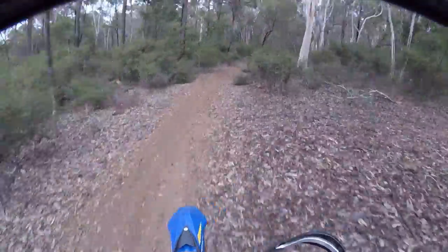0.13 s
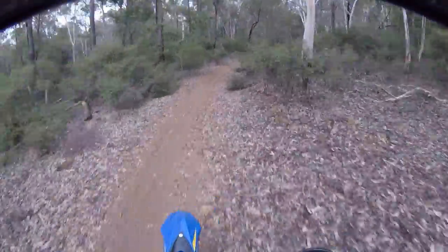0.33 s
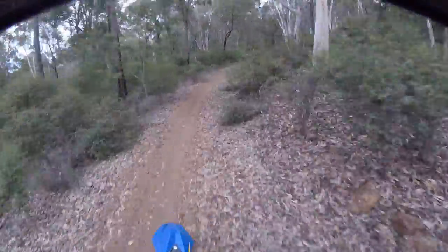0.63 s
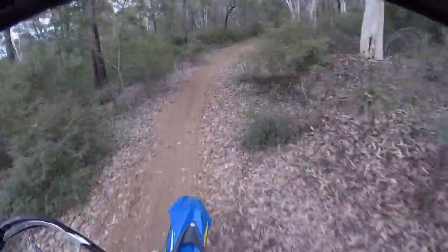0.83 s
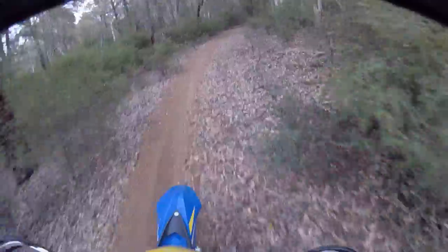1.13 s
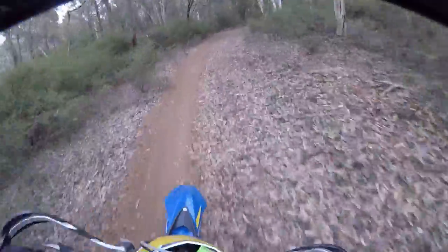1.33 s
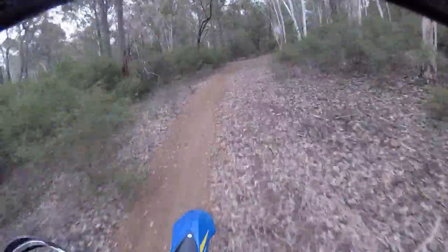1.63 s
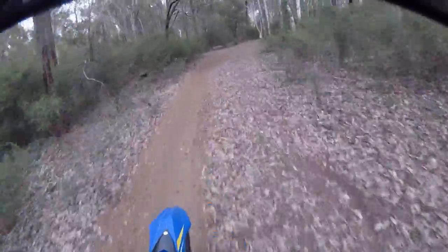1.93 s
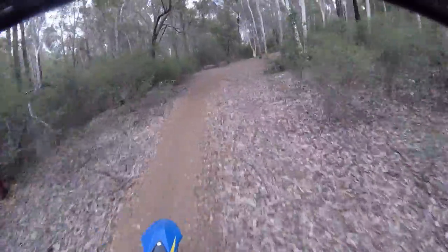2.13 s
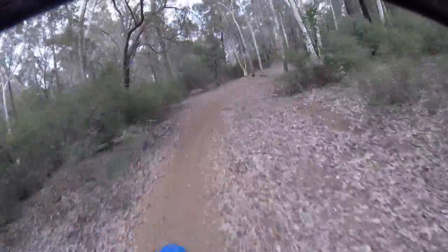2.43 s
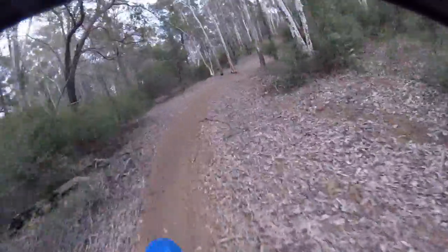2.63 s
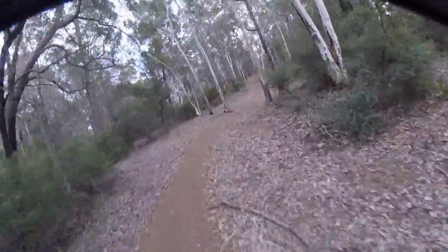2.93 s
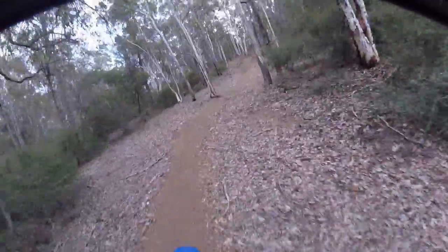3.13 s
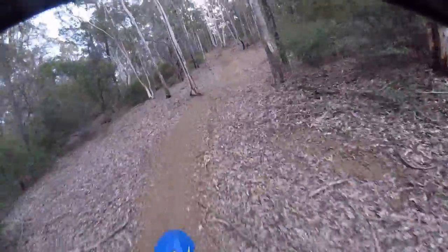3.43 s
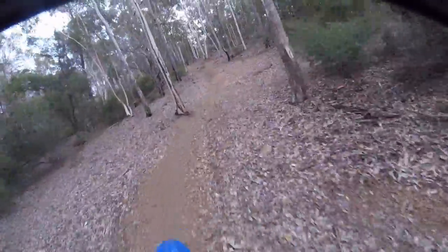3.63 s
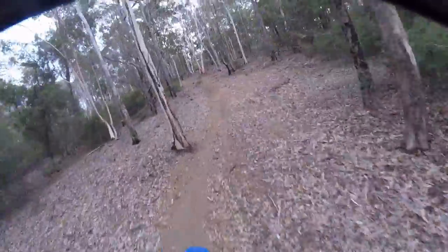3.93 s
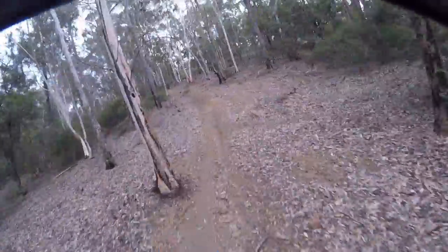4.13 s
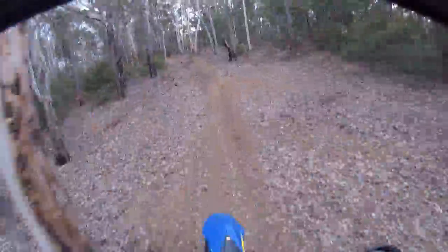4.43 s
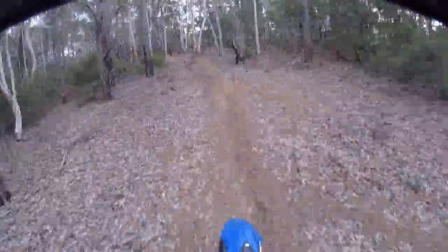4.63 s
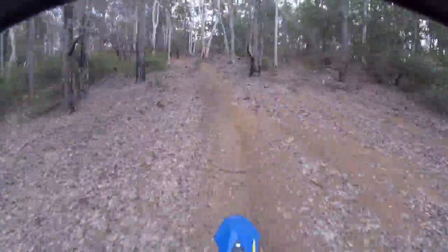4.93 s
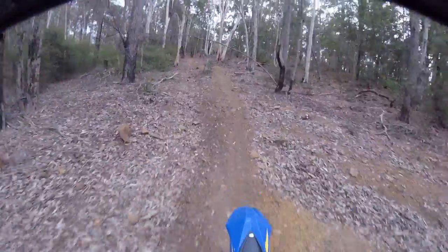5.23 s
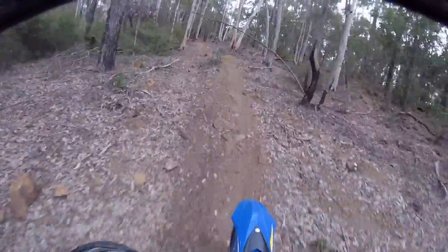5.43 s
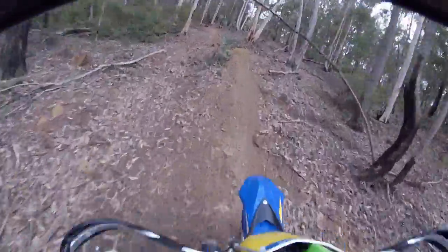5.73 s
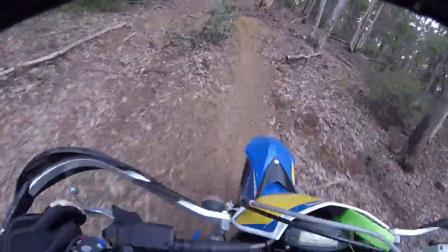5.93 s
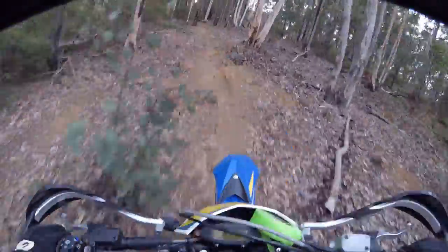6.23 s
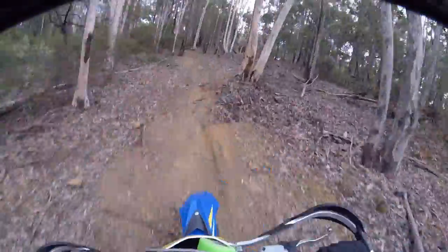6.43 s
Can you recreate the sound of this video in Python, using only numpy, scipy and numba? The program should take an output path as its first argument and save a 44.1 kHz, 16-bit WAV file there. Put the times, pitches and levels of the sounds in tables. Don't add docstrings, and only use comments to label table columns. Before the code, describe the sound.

A single-cylinder dirt bike rides a bush trail, revs surging early, sagging to a low chug, then climbing again over rattling metal and wind rumble.

```python
import sys
import numpy as np
from scipy import signal
from scipy.fft import rfft, irfft
from scipy.io import wavfile
from scipy.ndimage import uniform_filter1d
from numba import njit

SR = 44100
rng = np.random.default_rng(int(sys.argv[2]) if len(sys.argv) > 2 else 0)


def transcribe(u):
    v = np.clip(np.atleast_2d(u).T, -1, 1)
    q = np.round(v * 32767).astype(np.int16)
    wavfile.write(sys.argv[1], SR, q)


def to_linear_factor(level_db):
    exponent = np.asarray(level_db, float) / 20
    return 10 ** exponent


N = 291060
T = np.arange(N) / SR
BLOW_LEAD_S = .0066


def curves(table):
    time_s, *columns = np.transpose(table)
    return [np.interp(T, time_s, column) for column in columns]


def even(x):
    power = uniform_filter1d(uniform_filter1d(x ** 2, size=4000), size=4000)
    return x / np.sqrt(power + 1e-12)


@njit
def svf(x, centre_hz, width_hz):
    y, band_state, low_state = np.empty(len(x)), 0., 0.
    for i in range(len(x)):
        g = np.tan(np.pi * centre_hz[i] / SR)
        k = width_hz[i] / centre_hz[i]
        v = (band_state + g * (x[i] - low_state)) / (1 + g * (g + k))
        band_state = 2 * v - band_state
        low_state = low_state + 2 * g * v
        y[i] = k * v
    return y


def band(x, centre_hz, width_hz):
    return svf(x, centre_hz + 0. * T, np.maximum(width_hz, 10) + 0. * T)


def body(x, modes):
    return sum(to_linear_factor(db) * band(band(x, hz, width_hz), hz, 3 * width_hz) for hz, width_hz, db in modes)


def lowpass(x, order, hz):
    return signal.sosfilt(signal.butter(order, hz, fs=SR, output="sos"), x)


def walk(rate_hz):
    hold = int(SR / rate_hz)
    steps = np.repeat(rng.standard_normal(N // hold + 1), hold)
    return uniform_filter1d(steps, hold)[:N]


def push(at, size, ms):
    x = np.zeros(N)
    x[np.clip(at, 0, N - 1)] = size
    return np.convolve(x, np.hanning(int(ms * SR / 1000) + 3))[:N]


def exhaust(turn, hz):
    # (time [s], crank drone level [dB], header thump level [dB])
    lows = [(0.0, -19.2, -28.1), (0.087, -20.6, -24.8), (0.174, -21.6, -25.8), (0.261, -21.9, -26.0),
            (0.347, -20.6, -32.4), (0.434, -20.2, -31.0), (0.521, -19.4, -25.6), (0.608, -20.0, -31.5),
            (0.695, -19.5, -35.3), (0.782, -19.7, -35.4), (0.868, -18.4, -31.9), (0.955, -22.1, -40.0),
            (1.042, -24.1, -40.0), (1.129, -25.3, -40.0), (1.216, -25.5, -40.0), (1.303, -28.0, -40.0),
            (1.389, -31.3, -31.6), (1.476, -32.3, -26.1), (1.563, -28.0, -31.7), (1.65, -25.7, -31.6),
            (1.737, -25.9, -32.2), (1.824, -24.2, -30.7), (1.911, -23.7, -34.4), (1.997, -23.5, -31.2),
            (2.084, -23.5, -29.4), (2.171, -24.2, -30.8), (2.258, -26.1, -22.4), (2.345, -25.4, -27.4),
            (2.432, -22.9, -29.2), (2.518, -23.8, -21.0), (2.605, -24.9, -18.9), (2.692, -25.0, -18.4),
            (2.779, -24.1, -18.4), (2.866, -24.7, -19.4), (2.953, -23.8, -19.4), (3.039, -24.6, -19.3),
            (3.126, -24.5, -19.0), (3.213, -23.7, -21.6), (3.3, -21.1, -26.5), (3.387, -21.1, -26.2),
            (3.474, -21.1, -25.8), (3.561, -21.2, -24.6), (3.647, -20.2, -24.6), (3.734, -20.9, -25.1),
            (3.821, -21.2, -22.7), (3.908, -23.3, -29.0), (3.995, -25.5, -32.8), (4.082, -22.3, -30.4),
            (4.168, -21.8, -22.6), (4.255, -22.6, -29.7), (4.342, -21.4, -28.3), (4.429, -21.8, -29.1),
            (4.516, -21.8, -29.6), (4.603, -21.5, -28.9), (4.689, -20.9, -32.0), (4.776, -22.6, -30.0),
            (4.863, -23.0, -29.0), (4.95, -23.7, -34.8), (5.037, -22.6, -32.7), (5.124, -22.5, -32.6),
            (5.211, -21.6, -38.4), (5.297, -21.7, -31.0), (5.384, -21.5, -37.5), (5.471, -22.0, -36.7),
            (5.558, -25.7, -38.2), (5.645, -29.5, -25.3), (5.732, -31.2, -23.4), (5.818, -26.4, -33.5),
            (5.905, -25.5, -31.3), (5.992, -27.5, -35.4), (6.079, -26.5, -31.7), (6.166, -25.6, -32.0),
            (6.253, -25.6, -30.3), (6.339, -27.2, -30.9), (6.426, -26.8, -32.5), (6.513, -24.1, -31.0),
            (6.6, -23.1, -32.9)]
    # (time [s], silencer ring level [dB], bark level [dB])
    pipe = [(0.0, -18, -29), (0.07, -23, -31), (0.11, -15.5, -29), (0.15, -23, -32.5), (0.66, -20.5, -28.5),
            (0.79, -14.5, -28.5), (0.84, -15, -21.5), (1.27, -18, -25), (1.29, -16, -26.5),
            (1.32, -30, -28), (1.38, -21.5, -33.5), (1.63, -30, -41), (1.89, -24, -33.5),
            (1.93, -20.5, -31), (2.13, -23.5, -35), (2.15, -25, -33), (2.19, -39, -35), (2.22, -20, -32.5),
            (2.24, -21.5, -37.5), (2.48, -29, -37), (2.5, -20.5, -37), (2.66, -22, -34),
            (2.7, -20.5, -33.5), (2.74, -22.5, -32.5), (2.76, -26.5, -35), (3.14, -27, -38.5),
            (3.2, -27, -37), (3.22, -34, -47.5), (3.23, -35, -34), (3.25, -20.5, -36.5), (3.31, -19, -30.5),
            (3.33, -21, -33.5), (3.4, -22, -32.5), (3.42, -22, -34), (3.67, -22, -32.5), (3.71, -21, -31),
            (3.73, -26, -33.5), (3.95, -32, -40), (3.99, -23.5, -38), (4.25, -21, -35), (4.28, -19, -28),
            (4.61, -17, -28.5), (4.87, -19.5, -28.5), (4.89, -22.5, -28), (5.11, -15.5, -24.5),
            (5.31, -20, -27), (5.5, -21, -25.5), (5.6, -25.5, -30.5), (5.68, -24.5, -29), (5.72, -21, -35),
            (5.79, -24.5, -35), (5.84, -19, -27), (5.86, -20.5, -33), (5.92, -19, -29.5), (5.99, -28, -30),
            (6.07, -28, -34.5), (6.14, -24, -33), (6.34, -27.5, -40.5), (6.36, -23.5, -41),
            (6.47, -32.5, -39), (6.51, -17, -28), (6.58, -16.5, -26), (6.6, -10, -15)]
    drone_db, thump_db = curves(lows)
    ring_db, bark_db = curves(pipe)
    throttle = np.clip((bark_db + 35) / 10, 0, 1)
    at = np.flatnonzero(np.diff(np.floor(turn + BLOW_LEAD_S * hz)))
    at = at + (2 * rng.standard_normal(len(at))).astype(int)
    blow = push(at, to_linear_factor(1.1 * rng.standard_normal(len(at))), ms=1.1)
    return (to_linear_factor(ring_db) * silencer_ring(blow, throttle)
            + to_linear_factor(thump_db - 0.5) * header_thump(blow)
            + to_linear_factor(bark_db - 1.0) * tailpipe_bark(at, turn, hz, throttle)
            + to_linear_factor(drone_db + 1.5) * crank_drone(turn, hz))


def silencer_ring(blow, throttle):
    # (time [s], centre [Hz], width [Hz])
    chamber = [(0, 208, 103), (.55, 243, 111), (.72, 271, 86), (.84, 274, 40.7), (1., 272, 57),
               (1.28, 283, 56), (1.36, 283, 152), (1.6, 234, 178), (2.15, 220, 164), (2.25, 279, 119),
               (2.5, 290, 107), (3.2, 290, 107), (3.3, 324, 131), (3.7, 254, 152), (3.95, 276, 123),
               (4.22, 270, 120), (4.32, 314, 86), (4.95, 307, 86.4), (5.08, 264, 50), (5.2, 294, 64.4),
               (5.5, 315, 80.4), (5.66, 273, 153), (5.8, 310, 149), (5.9, 340, 70), (6.05, 335, 140),
               (6.45, 302, 161), (6.53, 256, 50.4), (6.6, 270, 50.3)]
    ring_hz, width_hz = curves(chamber)
    gulp = .45 * throttle * np.roll(blow, -int(.0072 * SR))
    drive = blow + gulp
    ring = even(band(band(drive, ring_hz, width_hz), ring_hz, 2 * width_hz))
    ring = ring + to_linear_factor(-13) * even(band(rng.standard_normal(N), 250, 220))
    ring = signal.sosfiltfilt(signal.butter(4, 400, fs=SR, output="sos"), ring)
    next_mode = even(band(band(drive, 350, 70), 355, 160))
    return ring + throttle * to_linear_factor(-8) * next_mode


def header_thump(blow):
    late_blow = np.roll(blow, int(.0009 * SR))
    return even(band(band(late_blow, 112, 50), 115, 80))


def tailpipe_bark(at, turn, hz, throttle):
    # (centre [Hz], width [Hz], level [dB])
    shock_modes = [(427, 56, -10.5), (558, 80, 10), (682, 150, 6), (936, 140, 3.5), (1054, 130, -5),
                   (1830, 170, -9.5)]
    # (centre [Hz], width [Hz], level [dB])
    gas_modes = [(550, 303, 4.5), (805, 636, 5.5), (1065, 470, -12), (1680, 550, -6.5), (2002, 390, -23.5)]
    front = at + int(.0037 * SR)
    crack = push(front, to_linear_factor(1.3 * rng.standard_normal(len(at))), ms=.65)
    crack = crack + 0.49 * np.roll(crack, int(0.00362 * SR))
    spike = even(body(crack, shock_modes)) + .7 * even(band(crack, 800, 1300))
    cycle = (turn + (BLOW_LEAD_S - .003) * hz) % 1
    puff = (1.1 + np.exp(-cycle / hz / .01)) * rng.standard_normal(N)
    bark = to_linear_factor(-7 + 9 * throttle) * spike + even(body(puff, gas_modes))
    thinning = np.clip((hz - 48) / 18, 0, .7)
    return even(bark - thinning * band(bark, 560, 260))


def crank_drone(turn, hz):
    lag_s = .008
    phase = 2 * np.pi * (turn - lag_s * hz)
    return np.cos(2 * phase) + to_linear_factor(14 * np.log2(hz / 63)) * np.cos(phase)


def rattle(turn):
    # (time [s], rattle level [dB], brightness of the top [dB])
    levels = [(0.0, -34, -19.5), (0.02, -44.5, -13.5), (0.29, -48, -18.5), (0.42, -44, -20),
              (0.79, -44, -10.5), (0.84, -37, -30), (0.99, -40.5, -12), (1.25, -35.5, -7.5),
              (1.43, -47.5, -10), (1.6, -49, -20), (1.89, -48, -17), (1.93, -55, -39), (1.95, -39, -58),
              (1.97, -47, -12), (2.0, -47.5, -11), (2.65, -49.5, -51), (3.22, -50.5, -5),
              (3.34, -43.5, -31), (3.36, -40.5, -25), (3.4, -49, -48.5), (3.42, -46, -26), (3.47, -45, -15),
              (3.71, -45.5, -21), (3.73, -47, -35.5), (3.75, -53, -54), (3.77, -50, -19), (3.8, -49, -27),
              (4.25, -48, -21), (4.3, -39.5, -23), (4.41, -44, -19), (5.48, -42.5, -16), (5.75, -48, -18),
              (5.97, -40, -21), (6.34, -48.5, -24), (6.4, -45, -26), (6.49, -49.5, -33), (6.54, -39.5, -18),
              (6.6, -40, -7)]
    # (centre [Hz], width [Hz], level [dB])
    knock_modes = [(1900, 210, -0.5), (3280, 400, 1), (4830, 890, 0.5), (6444, 470, 10.5), (5200, 560, -2)]
    rattle_db, top_db = curves(levels)
    beat = 1 + .22 * np.cos(2 * np.pi * (turn - .1)) + .15 * np.cos(4 * np.pi * turn)
    knock_db = 1.8 * rng.exponential(size=N // 40 + 1).repeat(40)[:N]
    knocks = rng.standard_normal(N) * to_linear_factor(knock_db) * beat
    metal = np.zeros(N)
    for hz, width_hz, db in knock_modes:
        metal += to_linear_factor(db + 2.2 * walk(13)) * band(band(knocks, hz, width_hz), hz, 2 * width_hz)
    metal = lowpass(metal, 4, 7100)
    top = band(band(knocks, 5900, 2200), 9900, 5000) * to_linear_factor(2.5 * walk(13))
    return to_linear_factor(rattle_db) * (even(metal) + to_linear_factor(top_db + 1.5) * even(top))


def stones():
    # (time [s], peak level [dB])
    flicks = [
        (6.3837, -37.5),
        (6.3945, -46.5),
        (6.4113, -31.5),
    ]
    time_s, peak_db = np.transpose(flicks)
    hits = np.zeros(N)
    hits[(time_s * SR).astype(int)] = to_linear_factor(peak_db + 5.5)
    tail = rng.standard_normal(300) * np.exp(-np.arange(300) / 70.)
    return band(np.convolve(hits, tail)[:N], 8500, 8000)


def wind():
    # (time [s], rumble level [dB])
    rumble = [(0.0, -21.5), (0.05, -33.5), (0.22, -23), (0.39, -15.5), (0.55, -33.5), (0.64, -18),
              (0.88, -29.5), (1.27, -42), (1.36, -18.5), (1.47, -41.5), (1.56, -23), (1.75, -32.5),
              (2.37, -23), (2.52, -21), (2.59, -37.5), (2.68, -28.5), (3.03, -44), (3.34, -21.5),
              (3.4, -37.5), (3.69, -31), (3.8, -32), (3.92, -22.5), (4.21, -28.5), (4.32, -25.5),
              (4.45, -39.5), (4.5, -24.5), (4.56, -24.5), (4.72, -26), (4.78, -30), (4.93, -29),
              (5.02, -26), (5.07, -27.5), (5.22, -37.5), (5.29, -25), (5.59, -27), (5.66, -26.5),
              (5.73, -27.5), (5.96, -20), (6.12, -27), (6.38, -18), (6.49, -24.5), (6.54, -36), (6.6, -24)]
    rumble_db, = curves(rumble)
    air = rng.standard_normal(N)
    flutter = even(band(band(air, 29, 11), 30, 30))
    skirt = even(band(air, 60, 300))
    return to_linear_factor(rumble_db - 2.5) * (flutter + to_linear_factor(-11 + 2 * walk(6)) * skirt)


def scene():
    # (time [s], firing rate [Hz])
    revs = [(0.0, 43.77), (0.087, 41.39), (0.174, 39.95), (0.261, 40.45), (0.347, 44.93), (0.434, 44.8),
            (0.521, 42.48), (0.608, 43.99), (0.695, 45.35), (0.782, 50.01), (0.868, 57.48), (0.955, 61.28),
            (1.042, 62.28), (1.129, 62.05), (1.216, 64.56), (1.303, 62.3), (1.389, 51.02), (1.476, 41.46),
            (1.563, 41.27), (1.65, 38.51), (1.737, 38.97), (1.824, 38.52), (1.911, 40.95), (1.997, 42.02),
            (2.084, 40.12), (2.171, 37.12), (2.258, 34.12), (2.345, 36.14), (2.432, 35.22), (2.518, 34.48),
            (2.605, 34.22), (2.692, 33.76), (2.779, 31.62), (2.866, 29.16), (2.953, 28.24), (3.039, 28.38),
            (3.126, 27.44), (3.213, 29.9), (3.3, 34.34), (3.387, 31.63), (3.474, 33.09), (3.561, 31.72),
            (3.647, 33.07), (3.734, 30.46), (3.821, 29.99), (3.908, 25.56), (3.995, 29.59), (4.082, 27.47),
            (4.168, 27.91), (4.255, 30.95), (4.342, 33.18), (4.429, 34.56), (4.516, 32.81), (4.603, 34.0),
            (4.689, 37.03), (4.776, 37.77), (4.863, 38.09), (4.95, 40.24), (5.037, 39.03), (5.124, 41.33),
            (5.211, 45.97), (5.297, 43.12), (5.384, 44.42), (5.471, 44.91), (5.558, 45.53), (5.645, 39.67),
            (5.732, 34.23), (5.818, 37.25), (5.905, 41.3), (5.992, 42.6), (6.079, 39.11), (6.166, 35.9),
            (6.253, 38.55), (6.339, 31.43), (6.426, 34.15), (6.513, 36.63), (6.6, 43.92)]
    hz, = curves(revs)
    turn = -.08 + np.cumsum(hz) / SR
    return (exhaust(turn, hz) + rattle(turn) + stones() + wind())[None]


def treble_dropouts(x):
    # (start [s], length [s], treble lost above [Hz])
    dropouts = [(.439, .009, 2500), (.951, .011, 2600), (.994, .009, 2200), (1.077, .012, 2600),
                (1.36, .01, 2300), (1.612, .01, 2400), (1.914, .045, 3200), (2.72, .009, 2800),
                (2.807, .01, 2100), (2.933, .013, 1600), (3.383, .025, 3500), (3.617, .01, 2200),
                (3.725, .027, 2400), (4.085, .009, 2500), (4.257, .01, 2300), (4.315, .009, 2600),
                (5.664, .014, 2200), (5.791, .014, 3200), (5.879, .012, 3000), (5.94, .014, 3200)]
    # (low edge [Hz], high edge [Hz])
    kept_hz = (6050, 6900)
    for start_s, length_s, edge_hz in dropouts:
        a = int((start_s - .02) * SR)
        piece = x[a:a + 4096]
        f = np.fft.rfftfreq(len(piece), 1 / SR)
        gone = (f > edge_hz) & ((f < kept_hz[0]) | (f > kept_hz[1]))
        gone |= (f > edge_hz - 1500) & (f < edge_hz) & ((edge_hz - f) % 520 > 230)
        lost = irfft(rfft(piece) * gone, len(piece))
        t = T[a:a + 4096] - start_s
        fade = np.clip(np.minimum(t + .006, length_s + .006 - t) / .009, 0, 1)
        x[a:a + 4096] = piece - lost * fade
    return x


def roll_off(x):
    return signal.sosfilt(signal.butter(12, 13600, fs=SR, output="sos"), x)


def record(dry):
    x = np.tanh(0.74 * dry[0]) / 0.53
    x = lowpass(x, 5, 9000)
    x = treble_dropouts(x)
    return roll_off(x[None])


dry = scene()
out = record(dry)
transcribe(out)
```